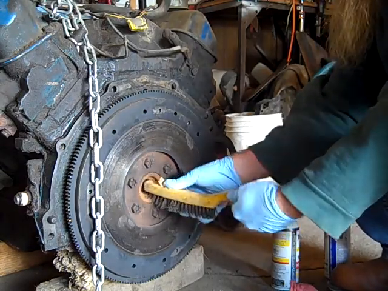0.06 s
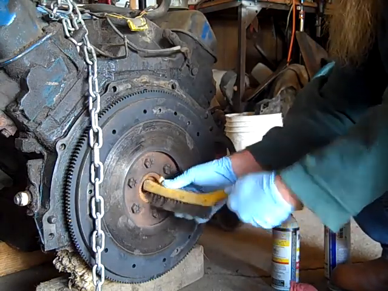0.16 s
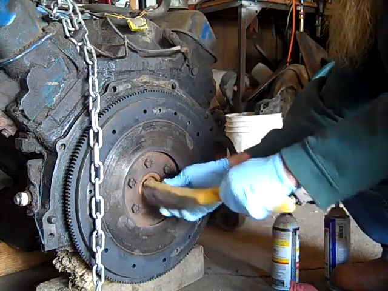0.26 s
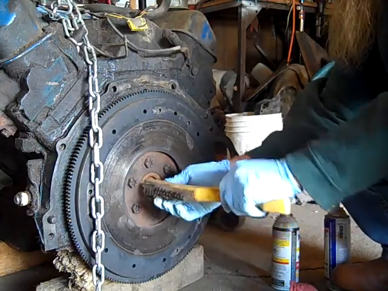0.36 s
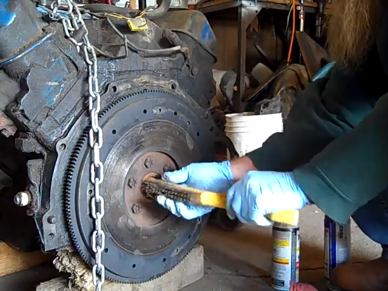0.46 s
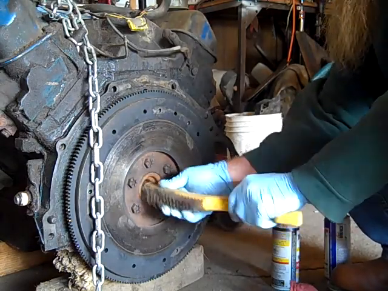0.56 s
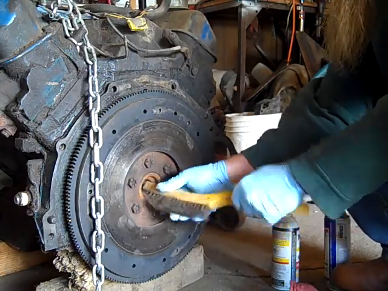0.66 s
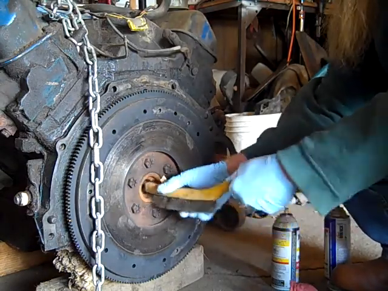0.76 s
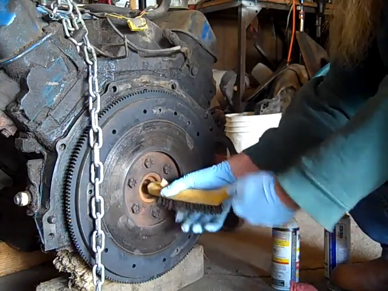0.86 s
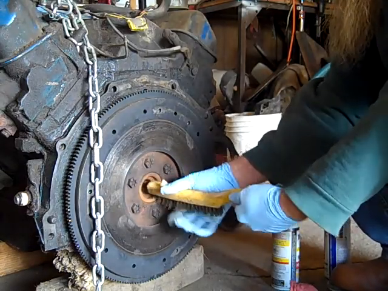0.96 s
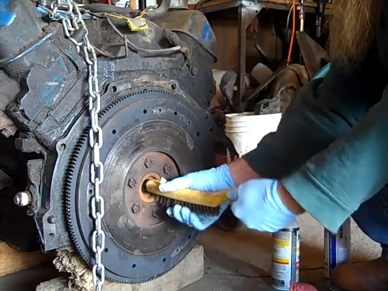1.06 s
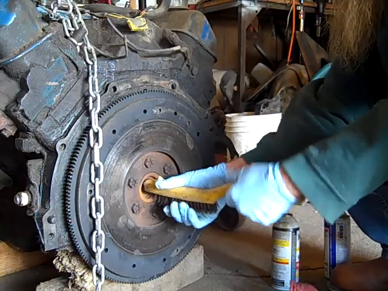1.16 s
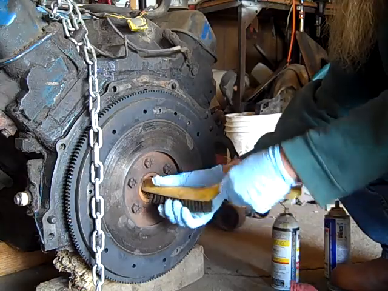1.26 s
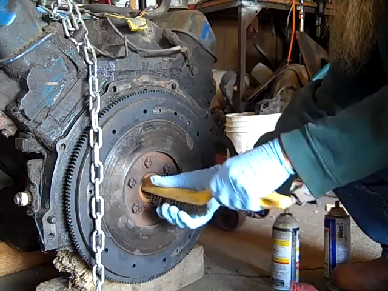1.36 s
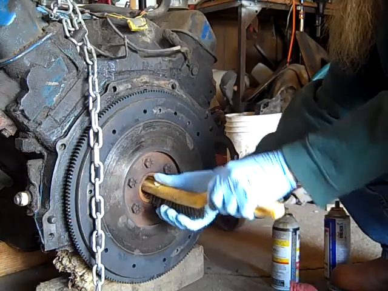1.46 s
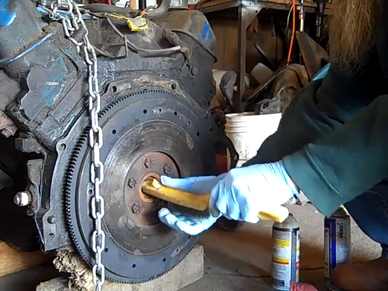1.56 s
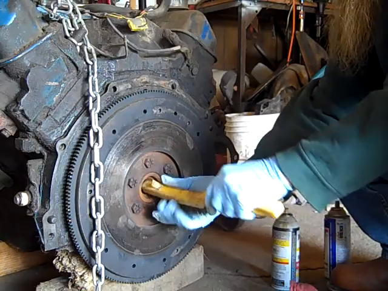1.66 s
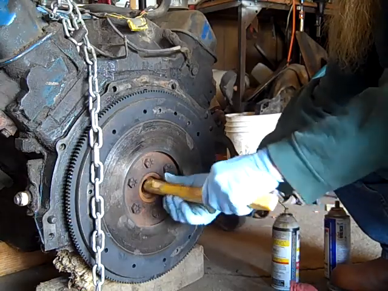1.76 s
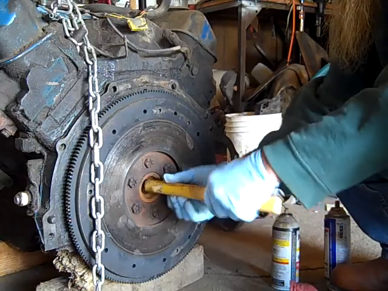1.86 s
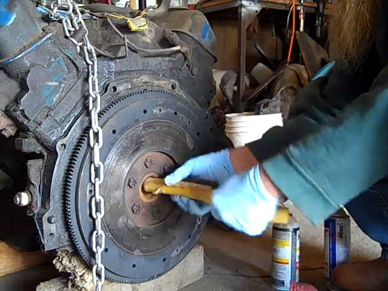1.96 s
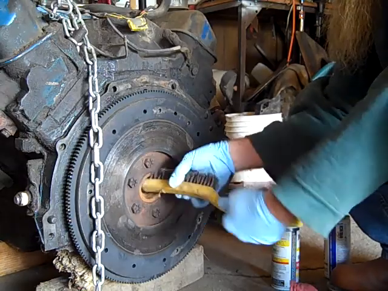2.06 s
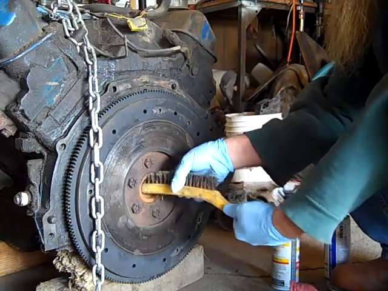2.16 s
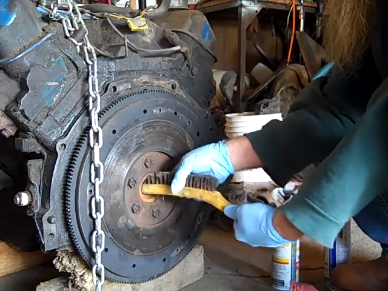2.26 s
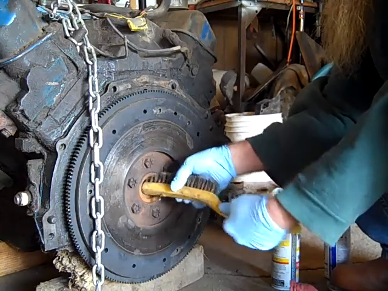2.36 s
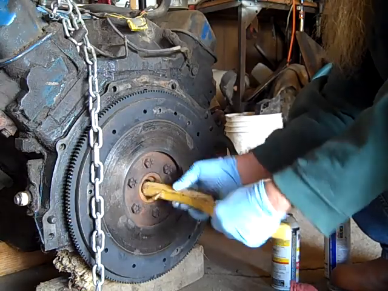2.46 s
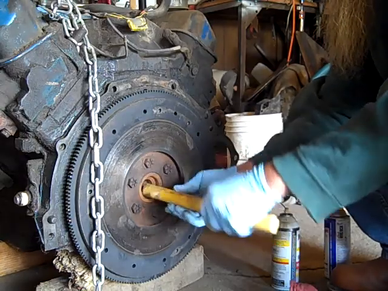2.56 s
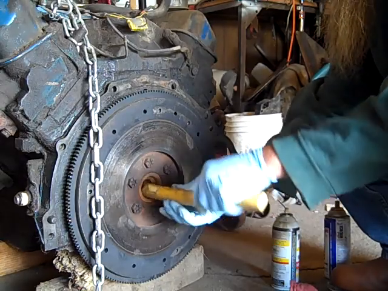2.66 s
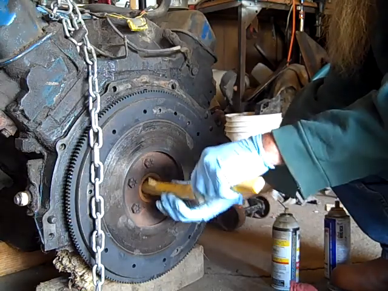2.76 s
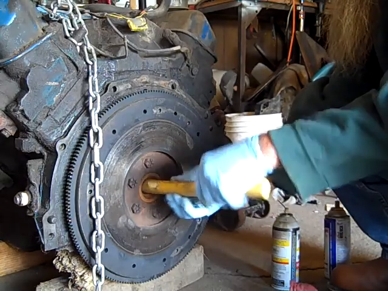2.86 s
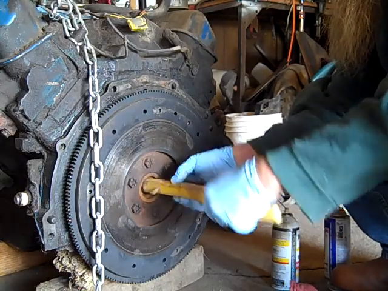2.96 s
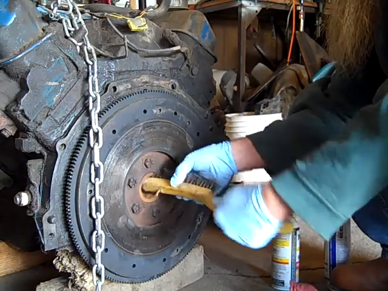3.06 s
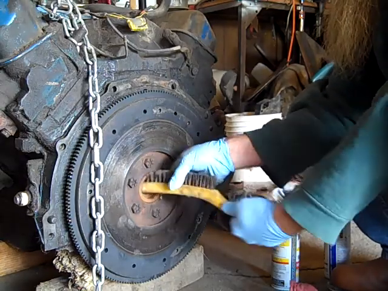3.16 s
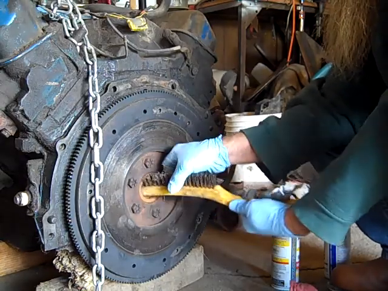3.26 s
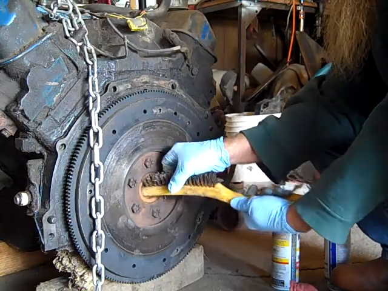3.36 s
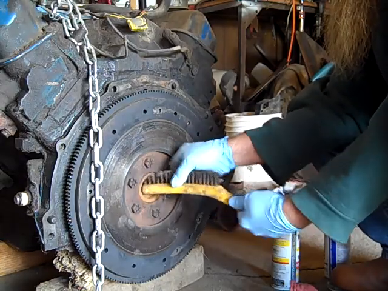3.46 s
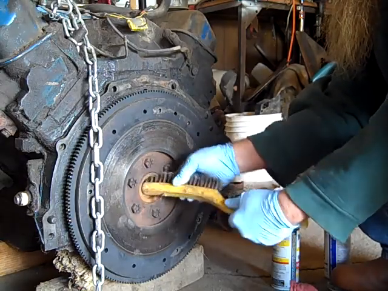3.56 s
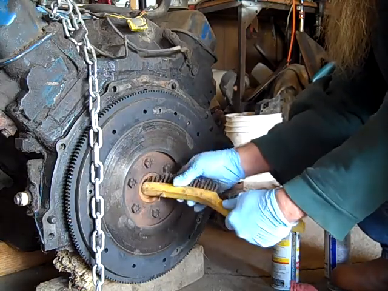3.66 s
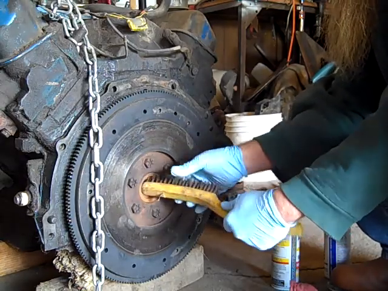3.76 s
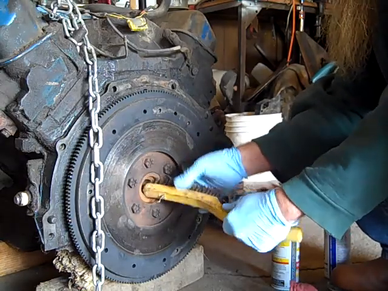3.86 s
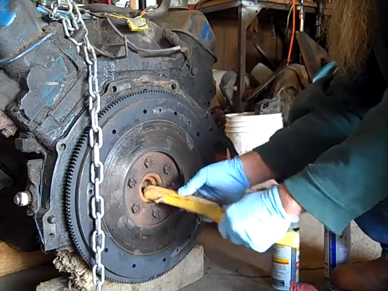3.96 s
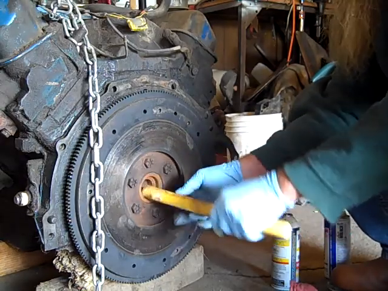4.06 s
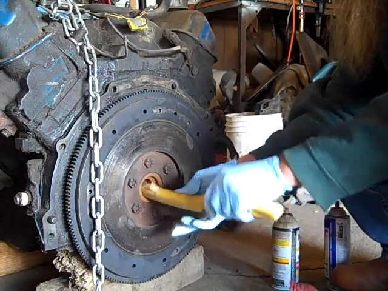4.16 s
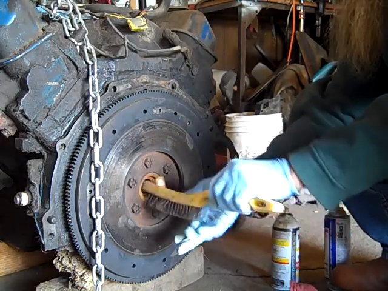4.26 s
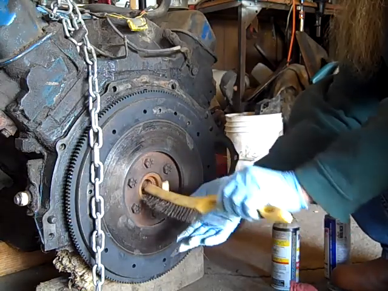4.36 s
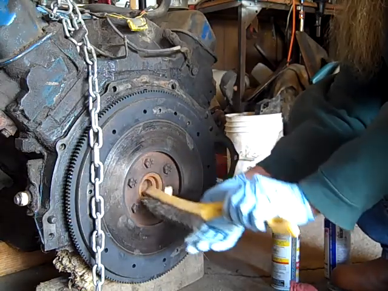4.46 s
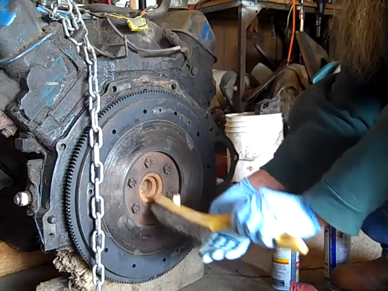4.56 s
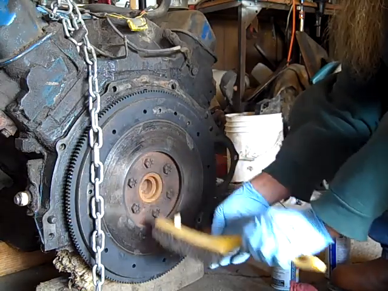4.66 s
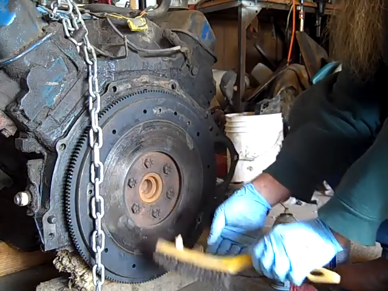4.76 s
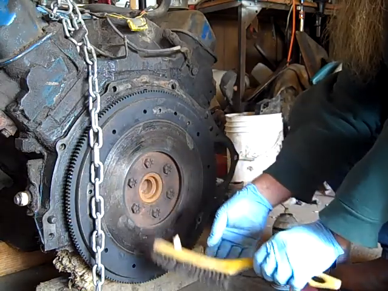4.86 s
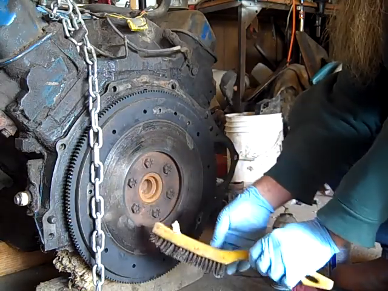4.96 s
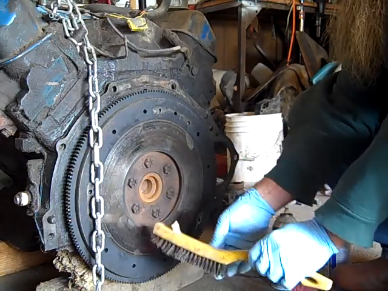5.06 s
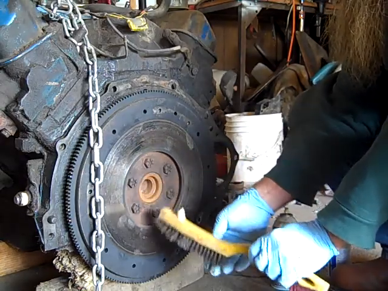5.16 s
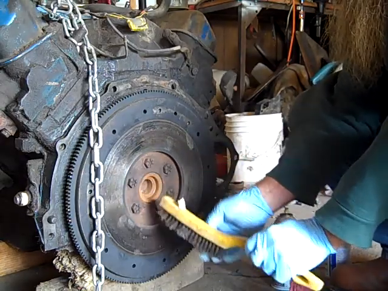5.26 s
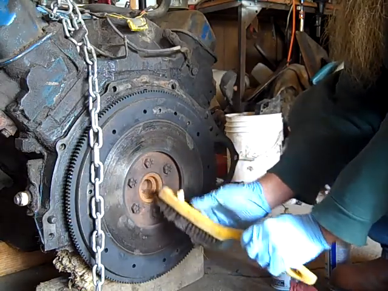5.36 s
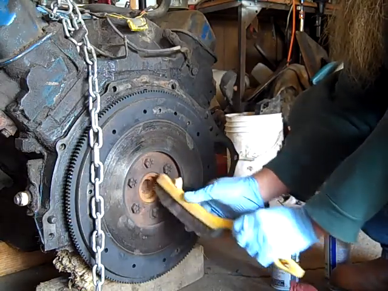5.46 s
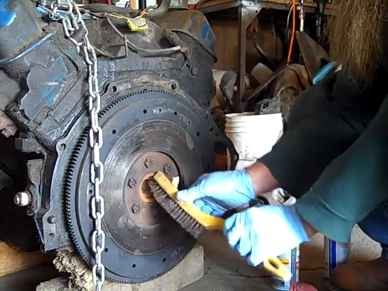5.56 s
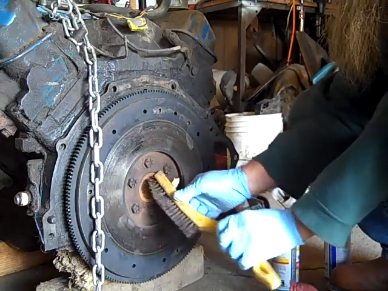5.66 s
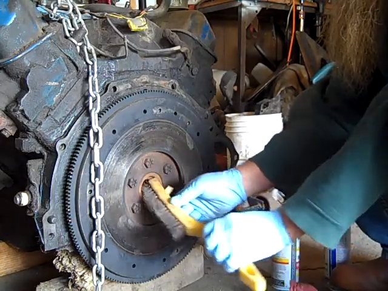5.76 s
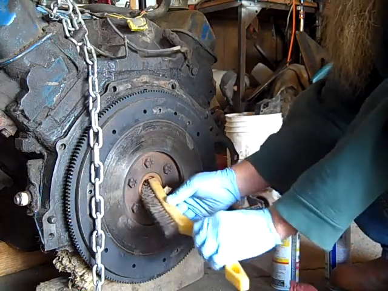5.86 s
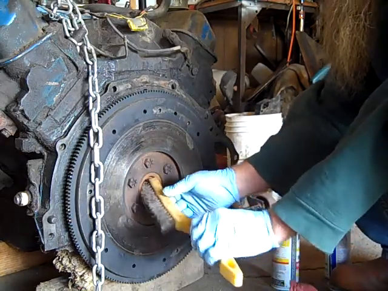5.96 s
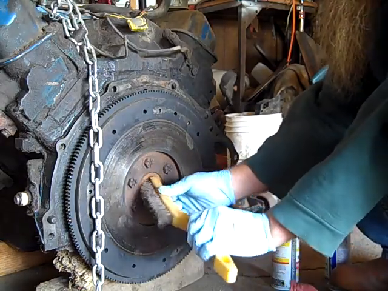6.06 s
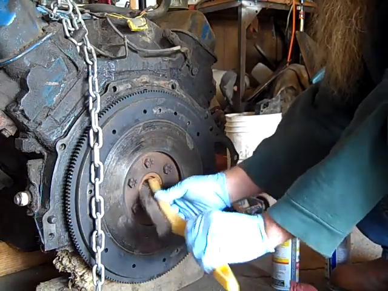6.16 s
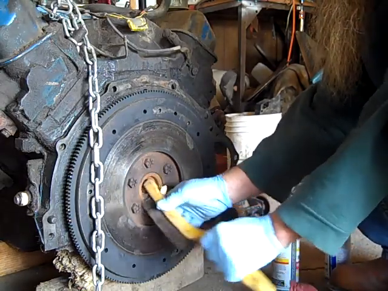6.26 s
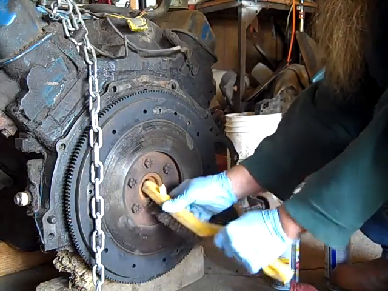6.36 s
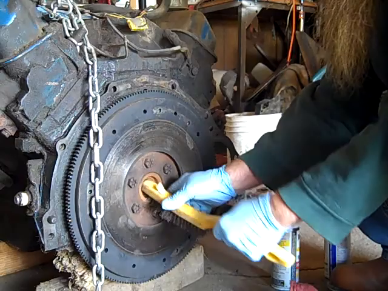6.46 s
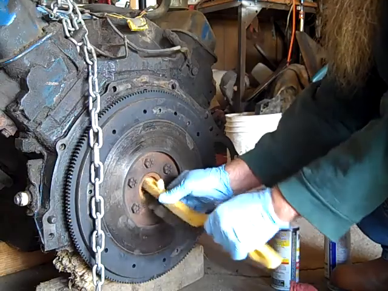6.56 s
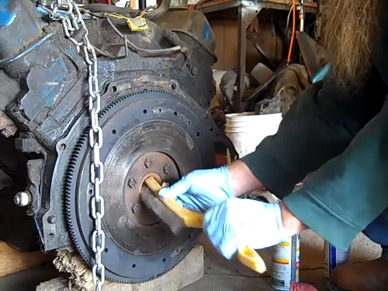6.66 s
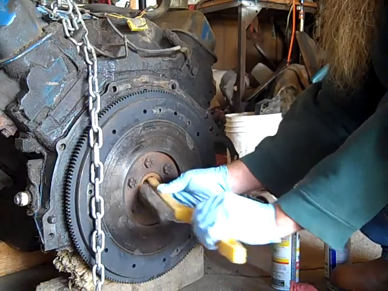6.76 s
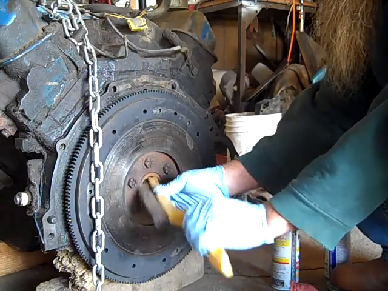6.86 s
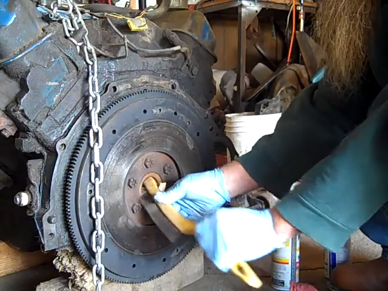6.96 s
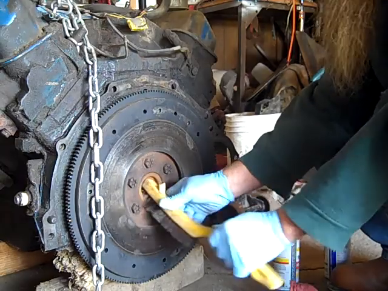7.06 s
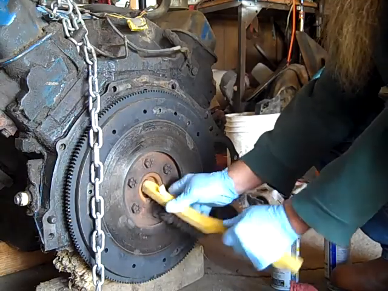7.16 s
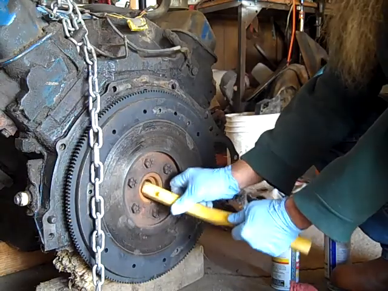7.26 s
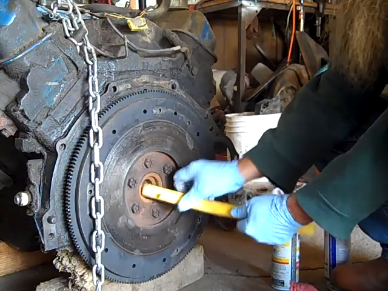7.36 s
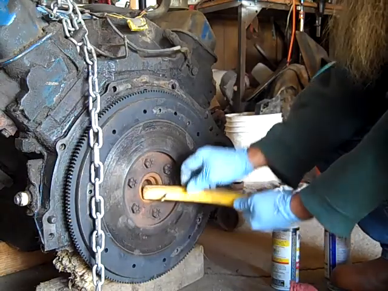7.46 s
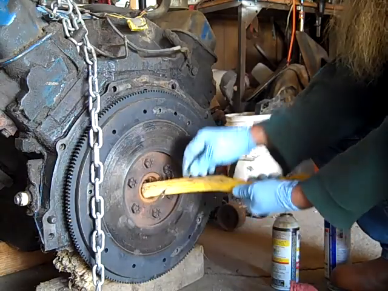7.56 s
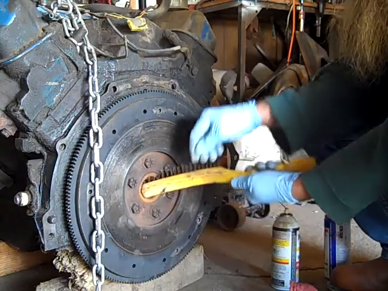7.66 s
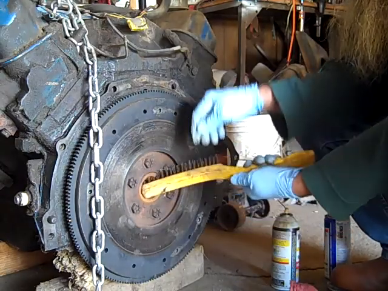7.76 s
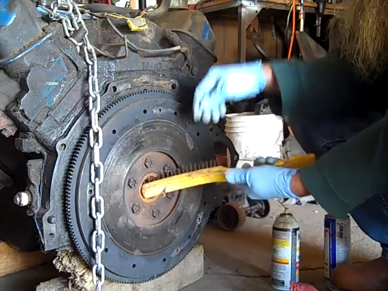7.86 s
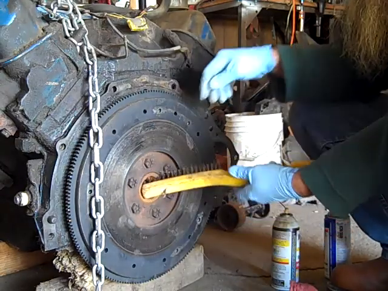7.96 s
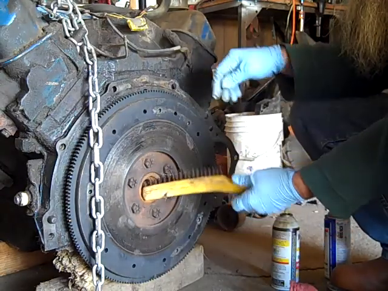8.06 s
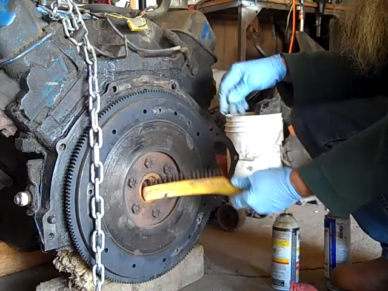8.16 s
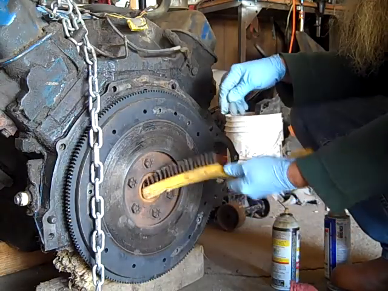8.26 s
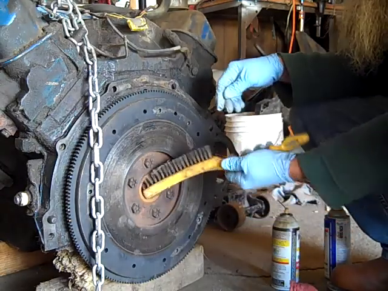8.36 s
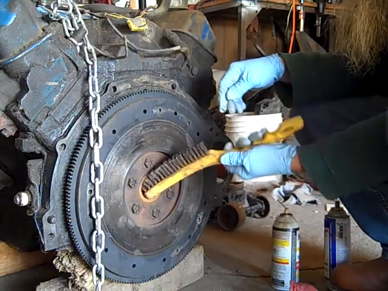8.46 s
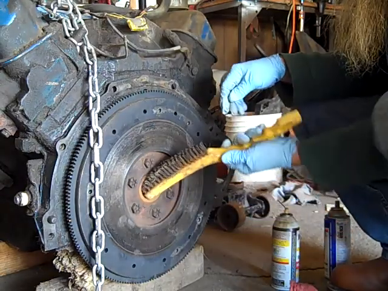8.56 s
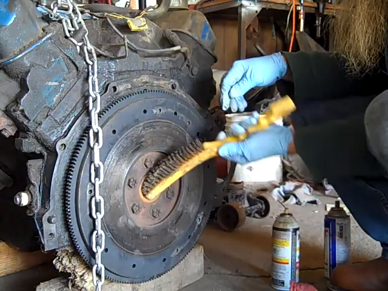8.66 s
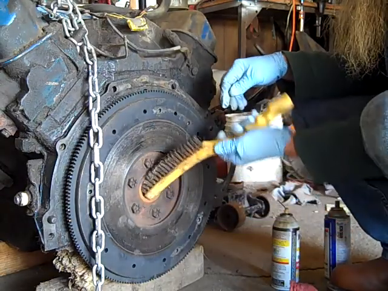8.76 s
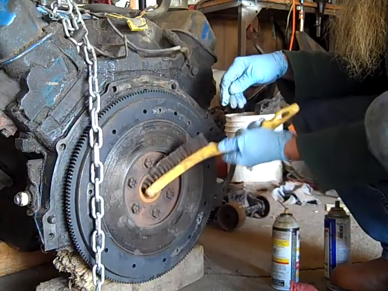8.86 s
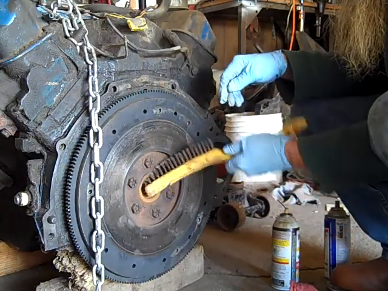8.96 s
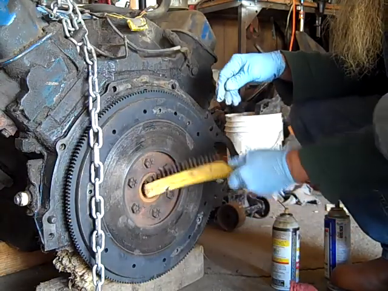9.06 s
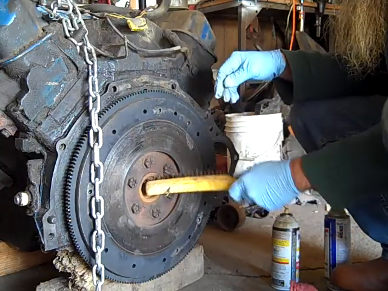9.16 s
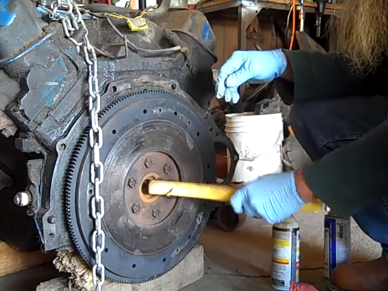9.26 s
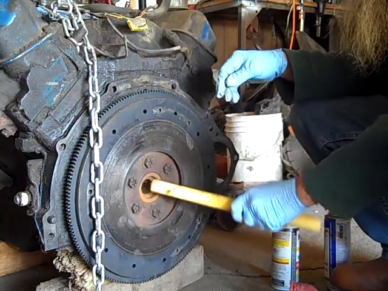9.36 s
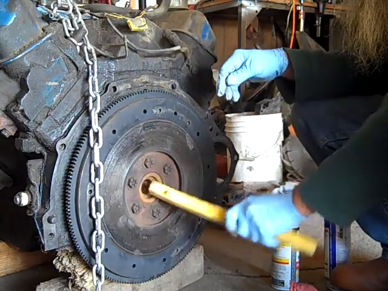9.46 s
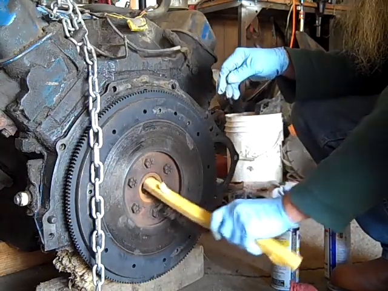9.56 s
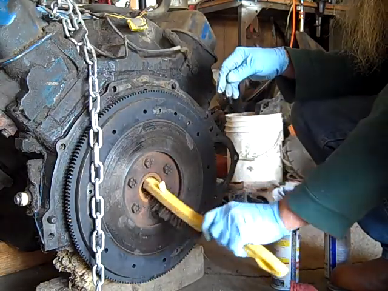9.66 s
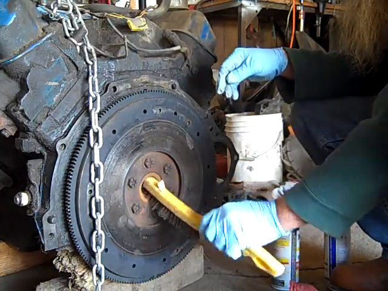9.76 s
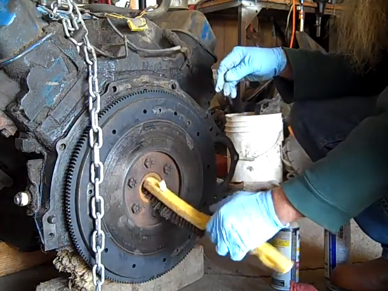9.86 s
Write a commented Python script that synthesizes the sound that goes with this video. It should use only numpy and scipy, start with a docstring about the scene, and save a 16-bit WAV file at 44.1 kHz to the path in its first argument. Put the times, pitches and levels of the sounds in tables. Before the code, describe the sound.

Close in a garage, a hand wire brush scrapes a rusty metal bore in quick irregular strokes, a bright hiss with gritty rasp and crisp ticks of springing wires. Scrubbing nearly stops around the middle, leaving faint hum and bird whistles, then resumes. A distant engine rises in pitch near the end. Soft low air puffs touch the stereo microphone early on; the left side is brighter.

```python
"""A hand wire brush is scrubbed in the rusty bore of an engine flywheel, close by in a garage.
Random slips of bristle tips make its hiss and rasp; ringing noise bursts are single wires snapping free,
and duller ones are the handle knocking. Behind it, sine waves make a faint hum, a bird's whistles and
a distant engine climbing in pitch. Shaped noise makes the room air and the puffs at the microphone."""
import sys
import numpy as np
from scipy import signal
from scipy.fft import rfft, irfft, next_fast_len
from scipy.io import wavfile
from scipy.ndimage import uniform_filter1d, map_coordinates

SR = 44100
rng = np.random.default_rng(int(sys.argv[2]) if len(sys.argv) > 2 else 0)


def bounce(signal):
    """Save signal as a 16-bit WAV file at the path given by the first command-line argument."""
    frames = np.transpose(np.atleast_2d(signal))
    limited = np.clip(frames, -1, 1)
    pcm = np.round(limited * 32767).astype(np.int16)
    wavfile.write(sys.argv[1], SR, pcm)


N = 437472

# All levels in the tables are set before the room and the microphone act on the sound.
# Strokes of the brush: start_s, length_s, hiss_db of the tips (before a small trim),
# lean_db (end of the stroke over its start), rasp_db (rust over hiss, before a small trim)
STROKES = [(-0.036, 0.15, -49.5, 2, -13.5), (0.185, 0.35, -42.0, -0.5, -10.5), (0.577, 0.37, -42, 0, -7.5),
           (0.975, 0.16, -50.5, 3, -10.5), (1.141, 0.199, -47.0, 4.5, -8.5), (1.336, 0.3, -60.0, 7, -2),
           (1.546, 0.19, -44, -1, -17), (1.732, 0.142, -44.5, -3, -10.5), (1.877, 0.39, -40, -5.5, -8.0),
           (2.355, 0.435, -40.0, -3.5, -11), (2.822, 0.029, -48, 1.5, -3.5), (2.893, 0.51, -42.5, -7.5, -6),
           (3.407, 0.19, -45.0, 14, -8.0), (3.597, 0.13, -44, -8.0, -6.5), (3.769, 0.35, -44.0, 6.0, -11),
           (4.088, 0.31, -39, -5.5, -10.5), (4.372, 0.14, -47.5, 1.0, -7.5), (5.378, 0.064, -52.5, 11, -8),
           (5.792, 0.06, -55, 0.0, -16.0), (5.896, 0.27, -49.5, -4, -9), (6.169, 0.438, -42.0, -7.5, -8.5),
           (6.618, 0.29, -42.0, -11, -9.0), (6.914, 0.48, -42, -7.5, -7.5), (7.362, 0.47, -43.5, -5.5, -7),
           (7.888, 0.067, -48, -3.5, -5.5), (7.964, 0.245, -52.5, -8.5, -4.5),
           (8.237, 0.153, -47.5, 3.5, -4.5), (8.394, 0.24, -43.5, -3.0, -8.5), (8.645, 0.12, -47, 11, -5),
           (8.758, 0.32, -45.0, 3.5, -8.5), (9.07, 0.34, -44.5, -10.5, -7), (9.358, 0.246, -46.5, 2, -7.5),
           (9.606, 0.17, -46.5, -9.5, -5), (9.86, 0.22, -57.5, 2.0, -4.5)]
# Light touch between strokes, when the bristles rustle in the bore: start_s, end_s, hiss_db
LIGHT_TOUCH = [(0, 4.5, -60), (5.2, 5.78, -65), (5.78, 9.92, -59)]
# Tone colour of the hissing bristle tips: pitch_hz, level_db (per Hz)
TIP_COLOUR = [(1500, -48), (3500, -15), (5000, -8), (6200, -1.5), (7300, -1), (8100, -2), (9000, -10.5),
              (10500, -17.5), (12000, -23), (14000, -19.5)]
# Tone colour of the rasping rust: pitch_hz, level_db (per Hz)
RASP_COLOUR = [(200, -35), (600, -14.5), (900, -9.5), (1350, -5.5), (1820, 2.5), (2300, -3), (2700, 1.3),
               (3300, -1.5), (4200, -1), (5500, -9), (9000, -30)]
# Stereo spread of the brush: pitch_hz, side_minus_mid_db
BRUSH_WIDTH = [(600, -22), (2400, -62), (3300, -28), (4400, -9.5), (6500, -12), (14000, -7)]
# Loudest wires snapping free: time_s, peak_db (approximate), ring_hz, crunch_db (rust relative to the tick)
SNAPS = [(.0872, -23, 8150, -30), (.3785, -19.5, 6160, -12.5), (.9032, -24.5, 7500, -15),
         (.9309, -16, 7040, -14.5), (1.4568, -29.5, 7800, -9), (1.5648, -22.5, 7550, -6.5),
         (1.7722, -20, 7400, -5), (1.8238, -25.5, 7370, -5), (1.901, -22.5, 7500, -10.5),
         (2.0337, -17, 5900, -11), (2.0932, -14.5, 6480, -8.5), (2.153, -23.5, 5110, -3),
         (2.1635, -26, 6080, -5), (2.21, -22, 7700, -6.5), (2.3376, -29.5, 4230, -8),
         (2.378, -20.5, 8600, -11), (2.839, -32, 4090, -7), (2.9053, -27.5, 7000, -10.5),
         (3.1467, -25, 5980, -19), (4.1425, -16.5, 6800, -24), (4.159, -22, 6190, -13.5),
         (4.1986, -14, 6400, -18), (4.348, -20.5, 7560, -10.5), (4.4358, -25, 7030, -10),
         (4.4752, -24, 6610, -9), (5.343, -23.5, 6200, -19), (5.4124, -29, 4550, -21),
         (5.5756, -30, 7400, -21), (5.8371, -29.5, 8020, -7.5), (5.938, -13, 5470, -14),
         (6.002, -26.5, 6330, -10), (6.615, -25.5, 6080, -15.5), (6.653, -23, 4930, -13.5),
         (7.648, -15.5, 7140, -24), (8.338, -29.5, 5550, -5.5), (8.3995, -25, 7640, -11),
         (8.6308, -23, 6300, -19), (8.7321, -27, 4800, -7), (8.747, -23.5, 7920, -7),
         (8.8555, -26, 6830, -5.5), (8.8965, -25.5, 7910, -11.5), (9.642, -23, 8170, -4),
         (9.6903, -19.5, 7740, -19)]
# Tone colour of a snapping wire before its ring: pitch_hz, level_db (per Hz)
WIRE_COLOUR = [(1000, -32.5), (3000, -10.5), (4500, -2), (6300, 2), (8000, 2), (9500, -6.5), (14000, -14.5)]
# Tone colour of the crunching rust: pitch_hz, level_db (per Hz)
CRUNCH_COLOUR = [(300, -22), (1000, -9), (1900, -5.5), (3200, 2.5), (4200, 5.5), (7000, -27)]
# Knocks of the handle: time_s, peak_db, pitch_hz (the pitch boosted most)
KNOCKS = [(.402, -43.5, 400), (.419, -40, 955), (2.032, -48, 1150), (2.091, -45, 1100), (2.152, -43, 1150),
          (4.413, -55, 380), (5.584, -38.5, 400), (5.937, -45, 550), (6.636, -47, 1050),
          (7.898, -43.5, 845), (8.089, -48, 750), (8.613, -41, 949), (9.103, -45, 900)]
# Ways the handle vibrates: pitch_hz, width_hz, level_db
HANDLE_MODES = [(333, 94, 2), (630, 400, -3.5), (980, 380, -1.5), (1690, 1060, -8.5)]
# Bird whistles: start_s, length_s, pitch_hz, level_db (before the bird is mixed in lower), trill_depth_hz
WHISTLES = [(0.044, 0.11, 4780, -57, 30), (.183, 0.097, 2970, -55, 50), (1.167, .24, 4305, -51, 110),
            (2.918, 0.094, 4360, -45, 110), (4.62, 0.3, 8500, -71, 40), (4.65, .42, 1222, -74, 35),
            (4.674, 0.13, 4670, -57, 50), (4.825, .15, 4320, -51.5, 130), (4.98, .3, 7950, -70, 50),
            (5.367, .16, 4380, -51, 110), (5.517, .092, 4650, -58, 60), (5.977, .1, 4380, -49, 100),
            (6.804, 0.18, 4410, -49, 110), (7.903, 0.14, 4370, -52.5, 110), (8.8, .14, 4400, -53, 110),
            (9.48, .12, 4410, -52, 110)]
# Distant engine: time_s, firing_rate_hz, level_db (both waver around these)
ENGINE = [(6.8, 62, -62), (6.95, 67.3, -42), (7.55, 69.9, -41), (7.75, 72.8, -49), (8.05, 74.2, -44.5),
          (8.35, 75.5, -53), (9.1, 78.1, -59.5), (9.37, 88, -44), (9.5, 92.9, -54.5), (9.92, 101, -49)]
# Quiet air of the garage: pitch_hz, level_db (per Hz)
AIR_COLOUR = [(25, -15.5), (55, -3), (115, -3), (150, -10), (260, -11.5), (370, -14.5), (520, -17.5),
              (1500, -27), (3500, -32.5), (6000, -29.5), (7900, -27), (10000, -45), (14000, -50)]
# Stereo spread of the air: pitch_hz, side_minus_mid_db
AIR_WIDTH = [(60, -8), (200, -11), (700, -7), (2400, -3.5), (4400, 5.5), (8000, -4)]
# Steady tones of the hum: pitch_hz, level_db (wavers), swell_db (extra at the top of the swell)
HUM = [(69.1, -62.5, -1.5), (107.7, -66.5, 3), (123.8, -67, 0), (187.1, -71, 8.5), (226, -78.5, 7),
       (278.6, -76.5, 6.5), (360, -73, -1.5), (806, -78, -4)]
# Puffs of air on the microphone: start_s, length_s, level_db (at the strongest moment)
PUFFS = [(0.099, 0.037, -46), (0.173, 0.12, -41.5), (0.275, 0.19, -47.5), (0.515, 0.47, -48),
         (1.417, .1, -39.5), (1.63, .18, -57), (2.58, 0.38, -62), (3.124, 0.066, -52), (3.43, .17, -58)]
# Stir of air under the puffs, dying away: time_s, level_db
DRAUGHT = [(0, -57), (1.3, -58), (2.4, -65.5), (3.7, -72), (4.5, -90)]
# Tone colour of puffs and draught: pitch_hz, level_db (per Hz)
PUFF_COLOUR = [(15, -4), (40, 4), (75, 5), (120, -1.5), (200, -11), (320, -33.5), (800, -79)]
# Stereo spread of puffs and draught: pitch_hz, side_minus_mid_db
PUFF_WIDTH = [(30, 2), (150, -3.5)]
# Fading of the garage's echo: pitch_hz, time_s (to fall by 60 dB)
GARAGE_FADE = [(150, 0.47), (1000, 0.27), (5000, 0.29), (14000, 0.14)]
# Loudness of the two microphone ports: pitch_hz, left_minus_right_db
PORT_BALANCE = [(40, -8.5), (110, -2.5), (220, .5), (1200, 0.5), (2800, -0.4), (4400, 0), (5300, -1),
                (6300, -3.5), (7000, 7.5), (7900, 15), (9200, 11.5), (10500, 10.5), (14000, 20.5)]
# Timing of the two ports: pitch_hz, left_lead_radians
PORT_LEAD = [(500, 0.75), (2800, -0.23), (4130, -0.15), (5170, -0.25), (6980, 0.67), (8010, -0.74),
             (8870, -1), (13100, -1.5), (14200, -2)]

ARCH = 0.39  # loudness grows as this power of the hand's speed
CONTACT_RASP_DB = -8  # rasp over hiss under the light touch
RELEASE_S = 0.0061  # the tufts settle after the hand
USUAL_STROKE_DB = -45
UNEVEN_DB, UNEVEN_PER_S = 1.0, 22  # the grip wavers as the brush crosses patches of rust
SNAP_CREST_DB = 22  # how far the peak of a snap stands above its mean level
FLIPS_PER_TURN, FLIP_SCATTER_S = 1.2, .05  # weaker wires, flipping over near the ends of strokes
FLIP_DB, FLIP_FOLLOWS = -33, 0.64  # typical peak in a usual stroke; dB gained per dB of stroke
TRILL_PER_S = 85  # usual trill rate; each whistle strays a little
AIR_DB = -58
TOP_HZ = 14300  # nothing is kept above this


def effort():
    """Hiss and rasp levels in dB: strokes swell and fade with the hand's speed, over a light resting touch."""
    t = np.arange(N) / SR
    hiss = sum(amp(db) ** 2 * ((t >= start) & (t < end)) for start, end, db in LIGHT_TOUCH)
    rasp = hiss * amp(CONTACT_RASP_DB) ** 2
    for start, length, db, lean_db, rasp_db in STROKES:
        progress, speed = swing(start, length)
        on = speed > 0
        power = (amp(db + lean_db * progress[on]) * speed[on] ** ARCH) ** 2
        hiss[on] += power
        rasp[on] += power * amp(rasp_db) ** 2
    keep = np.exp(-1 / (RELEASE_S * SR))
    powers = np.array([hiss, rasp]) + 1e-12
    return 10 * np.log10(signal.lfilter([1 - keep], [1, -keep], powers))


def swing(start, length):
    """Progress through a gesture, -.5 to .5, and its speed: a half sine, zero outside it."""
    progress = np.clip((np.arange(N) / SR - start) / length - .5, -.5, .5)
    return progress, np.abs(np.cos(np.pi * progress)) * (np.abs(progress) < .5)


def brush(tips_level, rasp_level, hiss_db, rasp_db, catch_db):
    """Tips slip over rust, more of them in harder strokes; being spread out, they reach each port differently."""
    force_db = np.clip(tips_level - USUAL_STROKE_DB, -15, 10)
    rate = 11000 * amp(.6 * force_db)  # slips per second
    # under a light touch few tufts bear on the metal, so each catch stands out more
    surges = catches(110, spread_db=4.5, life=0.0022)
    tufts = amp(1.44 * wobble(300)) + amp(catch_db - 0.43 * force_db) * surges
    tufts /= np.sqrt(uniform_filter1d(tufts ** 2, size=SR // 8))
    tufts *= amp(UNEVEN_DB * wobble(UNEVEN_PER_S))

    def scrape():
        """Hiss of the tips plus rasp of the rust, both surging with the tufts."""
        hiss = unit(shifting(coloured(slips(rate, spread_db=3), TIP_COLOUR), depth_db=1.9))
        rasp = unit(shifting(coloured(slips(.6 * rate, spread_db=2.5), RASP_COLOUR), depth_db=1.78))
        return tufts * (amp(tips_level + hiss_db) * hiss + amp(rasp_level + rasp_db) * rasp)
    return widen(scrape(), scrape(), BRUSH_WIDTH)


def slips(rate, spread_db):
    """Bristle tips slipping at random moments: clicks of uneven size, scaled to rms 1."""
    happens = rng.random(N) < rate / SR
    size = amp(spread_db * np.clip(rng.standard_normal(N), -2.5, 2.5))
    direction = np.sign(rng.standard_normal(N))
    return unit(happens * size * direction / np.sqrt(rate))


def catches(rate, spread_db, life):
    """Whole tufts let go at random moments: sudden surges of strength that fade within milliseconds."""
    happens = rng.random(N) < rate / SR
    surge = happens * amp(spread_db * np.clip(rng.standard_normal(N), -2, 2))
    return signal.lfilter([1], [1, -np.exp(-1 / (life * SR))], surge)


def shifting(x, depth_db):
    """Resonances come and go as the tufts bend to new lengths."""
    z = signal.stft(x, nperseg=512)[2]
    field = rng.standard_normal(z.shape)
    for _ in range(2):  # smooth over pitch, then over time
        field = uniform_filter1d(field, size=4, axis=0)
        field = uniform_filter1d(field, size=22, axis=1)
    return signal.istft(z * amp(depth_db * unit(field)), nperseg=512)[1][:N]


def pings(level, rate, top_hz, db):
    """Single bristles flick loose throughout, each ringing briefly: the longer the free wire, the lower."""
    count, t = int(rate * N / SR), np.arange(SR // 60) / SR
    start = rng.integers(0, N, count)
    length, size, life = np.clip(rng.standard_normal((count, 3)), -2.3, 2.3).T[:, :, None]
    fade_s = 0.0093 * np.exp(0.29 * life)  # time to fall by 60 dB
    hz = top_hz * np.exp(-.4 * np.abs(length))
    rings = amp(3.7 * size - 60 * t / fade_s) * np.sin(2 * np.pi * hz * t)
    places = start[:, None] + np.arange(len(t))
    track = np.bincount(places.ravel(), rings.ravel(), N)[:N]
    return amp(level + db) * unit(track)


def snaps(rows):
    """A wire drags to the rim, springs off with a tick and a crunch of rust, then rattles on its neighbours."""
    out, lead = np.zeros(N), SR // 200
    t = np.arange(-lead, SR // 25) / SR
    drag = amp(-24 + 2400 * t)
    release = amp(-60 * t / 0.0063)
    rattle = amp(-16.0) * amp(-60 * t / 0.076)
    shape = np.where(t < 0, drag, release + rattle)
    for s, db, ring_hz, crunch_db in rows:
        wire = coloured(shape * rng.standard_normal(len(t)), WIRE_COLOUR)
        tick = filtered(wire, lambda f: 0.39 + resonance(f, ring_hz, 1100))
        crunch = coloured(shape * rng.standard_normal(len(t)), CRUNCH_COLOUR)
        snap = unit(tick) + amp(crunch_db) * unit(crunch)
        add(out, s - lead / SR, amp(db - SNAP_CREST_DB) * snap)
    return out


def lesser_snaps():
    """Rows like those of SNAPS, drawn at random just after a stroke starts or just before it ends."""
    turns = []
    for start, length, db, _, _ in STROKES:
        turns += [(start, 1, db), (start + length, -1, db)]
    count = int(FLIPS_PER_TURN * len(turns))
    s, inward, stroke_db = np.transpose(turns)[:, rng.integers(0, len(turns), count)]
    late, size, ring, crunch = np.clip(rng.standard_normal((count, 4)), -2, 2).T
    time_s = s + inward * FLIP_SCATTER_S * np.abs(late)
    peak_db = FLIP_DB + FLIP_FOLLOWS * (stroke_db - USUAL_STROKE_DB) + 2.7 * size
    rows = zip(time_s, peak_db, 6800 * np.exp(0.15 * ring), -13.5 + 4 * crunch)
    return [row for row in rows if row[0] > 0]


def knocks():
    """The handle bumps the flywheel: a dull knock whose pitch depends on where it lands."""
    out, t = np.zeros(N), np.arange(SR // 3) / SR

    def body(f):
        """All the handle's vibrations together, with alternating signs."""
        return sum((-1) ** k * amp(db) * resonance(f, hz, width)
                   for k, (hz, width, db) in enumerate(HANDLE_MODES))
    for s, db, pitch_hz in KNOCKS:
        fade = amp(-60 * t / 0.026) + amp(-6.0) * amp(-60 * t / 0.35)
        blow = rng.standard_normal(len(t)) * fade
        knock = filtered(blow, lambda f: body(f) * (0.5 + resonance(f, pitch_hz, 320)))
        add(out, s, amp(db) * knock / np.abs(knock).max())
    return out


def bird():
    """Level whistles, made of sines with a fast trill, each sliding up a little into its note."""
    out = np.zeros(N)
    for s, length, pitch_hz, db, trill_hz in WHISTLES:
        t = np.arange(int(length * SR)) / SR
        rate = TRILL_PER_S * (1 + 0.057 * rng.standard_normal())
        trill = np.sin(2 * np.pi * rate * t) + .6 * wobble(250)[:len(t)]
        hz = pitch_hz * (1 - 0.01 * np.exp(-t / 0.0193)) + trill_hz * trill
        swell = np.clip(np.minimum(t, length - t) / 0.0063, 0, 1)
        add(out, s, amp(db) * swell * np.sin(2 * np.pi * np.cumsum(hz) / SR))
    return out


def engine():
    """The walls let through little but a far engine's firing note: a wavering sine and a faint octave."""
    hz, db = curves(ENGINE)
    phase = 2 * np.pi * np.cumsum(hz * (1 + 0.0048 * wobble(12))) / SR
    note = np.sin(phase) + amp(-31.5) * np.sin(2 * phase)
    return during(ENGINE) * amp(db + 0.52 * wobble(10)) * note


def background():
    """Noise for the room air, wavering sines for the hum, and low noise for puffs on the microphone."""
    air = amp(AIR_DB) * stereo_noise(AIR_COLOUR, AIR_WIDTH)
    tones = hum()
    flow = amp(curves(DRAUGHT)[0])
    flow = flow + sum(amp(db) * swing(s, length)[1] for s, length, db in PUFFS)
    puffs = flow * stereo_noise(PUFF_COLOUR, PUFF_WIDTH)
    return air + tones + puffs


def hum():
    """Sine tones that waver in level and phase; the level of each shifts for a moment midway."""
    t, total = np.arange(N) / SR, 0
    swell = np.exp(-((t - 4.7) / 1.2) ** 2)
    for hz, db, swell_db in HUM:
        level = amp(db + swell_db * swell + 2.5 * wobble(2.98))
        total = total + level * np.sin(2 * np.pi * hz * t + 1.06 * wobble(9))
    return total


def stereo_noise(spectrum, width):
    """Coloured noise, partly unrelated between the ports."""
    mid, side = (unit(filtered(rng.standard_normal(N), lambda f: amp(along(spectrum, f)))) for _ in range(2))
    return widen(mid, side, width)


def widen(mid, side, width):
    """Left and right from two unrelated sounds, mixed by a table of pitch_hz, side_db."""
    side = filtered(side, lambda f: amp(along(width, f)))
    return np.array([mid + side, mid - side])


def room(x, wet_db, early_db):
    """Direct sound plus reflections, which keep changing as arms and brush move."""
    ports = np.array([[1], [-1]])
    out = filtered(x, lambda f: np.exp(.5j * along(PORT_LEAD, f) * ports))
    source, step = np.atleast_2d(x).mean(axis=0), SR // 8
    for start in range(0, N, step):  # a fresh set of reflections every eighth of a second
        piece = source[None, start:start + step]
        echo = signal.fftconvolve(piece, garage_answer(wet_db, early_db), axes=1)
        for port, sound in zip(out, echo):
            add(port, start / SR, sound)
    return out


def garage_answer(wet_db, early_db):
    """One stereo echo made of fading noise: scatter from the engine block, then the garage's tail."""
    hz, t, z = signal.stft(rng.standard_normal((2, SR // 3)), SR, nperseg=256)
    fade = amp(-60 * t / along(GARAGE_FADE, hz)[:, None])
    tail = signal.istft(z * fade, SR, nperseg=256)[1]
    lag = np.arange(tail.shape[1]) / SR
    early = rng.standard_normal(tail.shape) * amp(-60 * lag / 0.023) * (lag > .001)
    answer = amp(wet_db) * tail / np.linalg.norm(tail[0])
    answer = answer + amp(early_db) * early / np.linalg.norm(early[0])

    # the ports lie close together, so only short waves differ much between them
    def turn(f):
        """Angle that shares the sound between mid and side."""
        return np.pi / 4 * np.clip(f / 3800, 0, 1.15)
    mid, side = filtered(answer, lambda f: np.array([np.cos(turn(f)), np.sin(turn(f))]))
    return np.array([mid + side, mid - side])


def amp(db):
    """Decibels turned into a plain multiplier."""
    return 10 ** (np.asarray(db) / 20)


def unit(x):
    """x scaled to rms 1."""
    return x / np.sqrt(np.mean(x ** 2) + 1e-20)


def along(points, hz):
    """A table of pitch_hz, value read on a log pitch axis."""
    f, v = np.transpose(points)
    return np.interp(np.log(hz + 1), np.log(f + 1), v)


def curves(rows):
    """One value per sample for each column after the time."""
    s, *cols = np.transpose(rows)
    return [np.interp(np.arange(N) / SR, s, c) for c in cols]


def during(rows):
    """A soft gate, open over the time span of a table."""
    t = np.arange(N) / SR
    is_open = (t >= rows[0][0]) & (t <= rows[-1][0])
    return uniform_filter1d(1. * is_open, size=600)


def wobble(rate):
    """A smooth random curve through this many random points a second."""
    knots = rng.standard_normal(int(N * rate / SR) + 4)
    return map_coordinates(knots, [np.arange(N) * rate / SR])


def filtered(x, response):
    """x with each frequency multiplied by a response, which may also shift its phase."""
    n = x.shape[-1]
    m = next_fast_len(n + 8192)
    return irfft(rfft(x, m) * response(np.fft.rfftfreq(m, 1 / SR)), m)[..., :n]


def coloured(x, points):
    """x through a filter with the given pitch_hz, level_db curve, which never sounds ahead of its input."""
    size = 4096
    cepstrum = irfft(np.log(amp(along(points, np.fft.rfftfreq(size, 1 / SR)))))
    # folding the cepstrum forward in time gives the minimum-phase filter
    cepstrum[1:size // 2] *= 2
    cepstrum[size // 2 + 1:] = 0
    return signal.fftconvolve(x, irfft(np.exp(rfft(cepstrum))))[:len(x)]


def resonance(f, centre, width):
    """Response of one damped vibration."""
    return 1j * f * width / (centre ** 2 - f ** 2 + 1j * f * width)


def add(track, s, sound):
    """Mix a sound into a track at time s."""
    part = track[max(0, round(s * SR)):][:len(sound)]
    part += sound[:len(part)]


def scene():
    """Brush and handle close by, bird and engine outside, room air all round."""
    tips_level, rasp_level = effort()
    scrubbing = brush(tips_level, rasp_level, hiss_db=0.62, rasp_db=0.19, catch_db=-2.5)
    flicks = pings(tips_level, rate=260, top_hz=8520, db=-11.5)
    wires = snaps(SNAPS + lesser_snaps())
    near = room(scrubbing + flicks + wires + knocks(), wet_db=-12, early_db=-10)
    outside_bird = amp(-5) * room(bird(), wet_db=4, early_db=2)
    return near + outside_bird + engine() + background()


def record(dry):
    """The left port is much brighter than the right; both hiss faintly, and the highest treble is cut."""
    def ports(f):
        """Gain of each port, keeping their average at 1."""
        gains = amp(along(PORT_BALANCE, f) * np.array([[.5], [-.5]]))
        return gains / gains.mean(axis=0)
    hiss = amp(-73.0) * rng.standard_normal((2, N))
    return filtered(filtered(dry, ports) + hiss, lambda f: f < TOP_HZ)


dry = scene()
out = record(dry)
bounce(out)
```